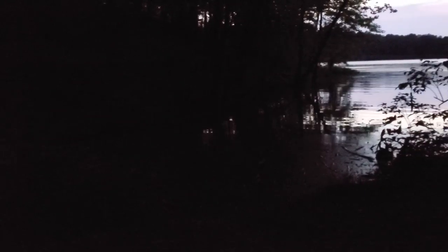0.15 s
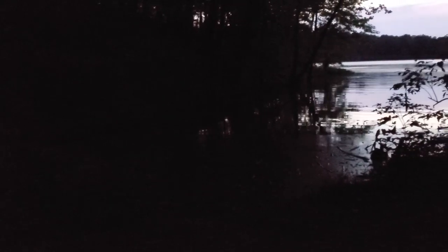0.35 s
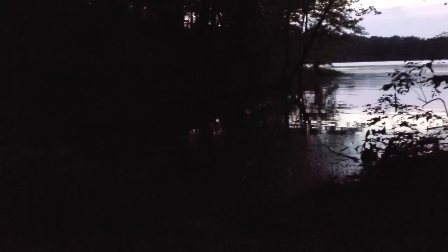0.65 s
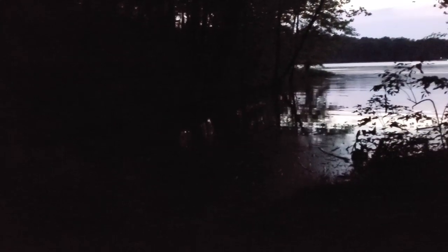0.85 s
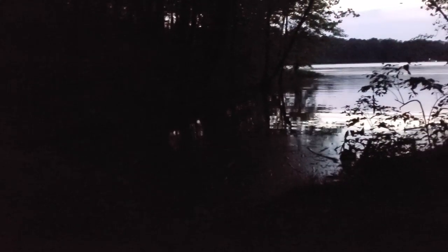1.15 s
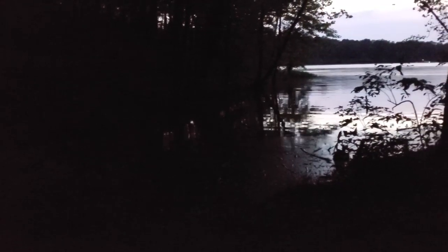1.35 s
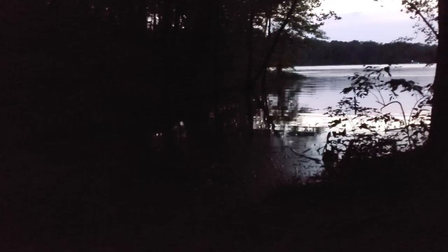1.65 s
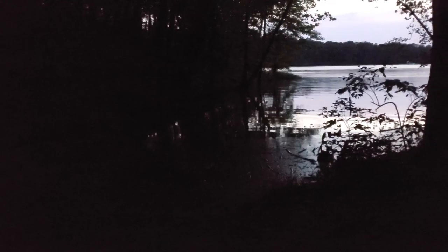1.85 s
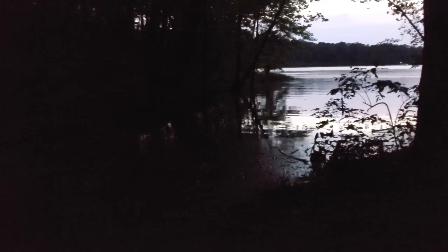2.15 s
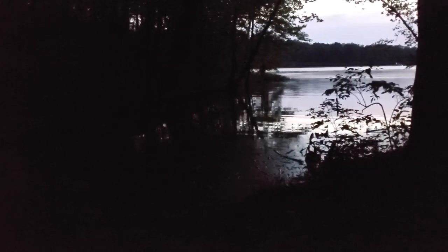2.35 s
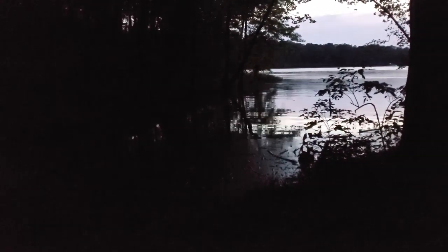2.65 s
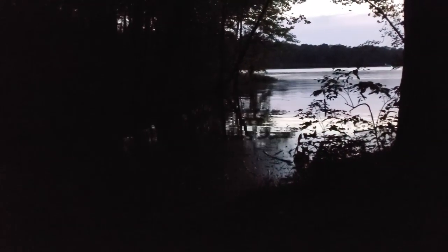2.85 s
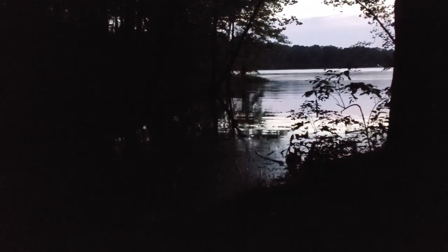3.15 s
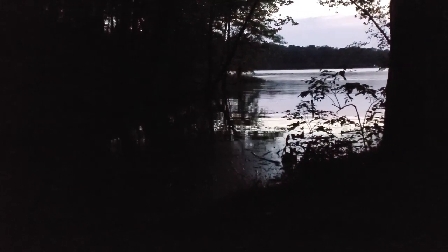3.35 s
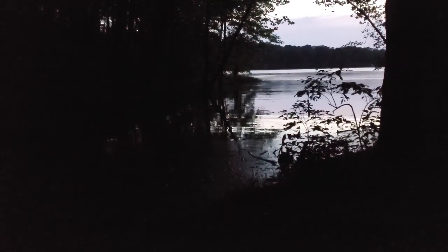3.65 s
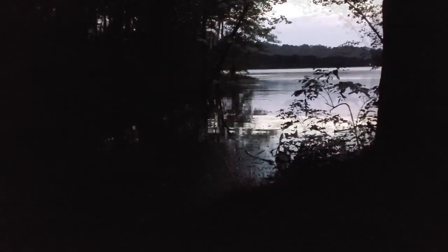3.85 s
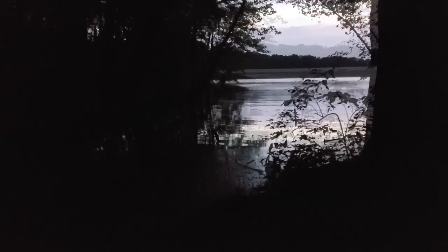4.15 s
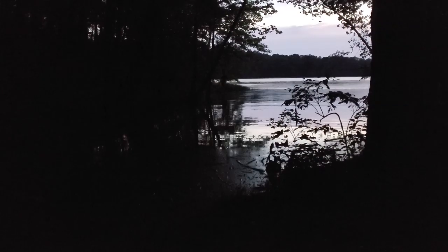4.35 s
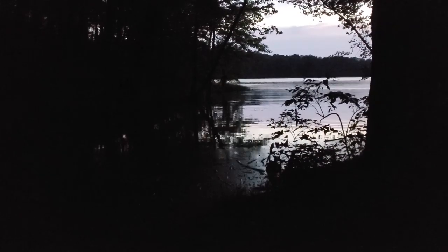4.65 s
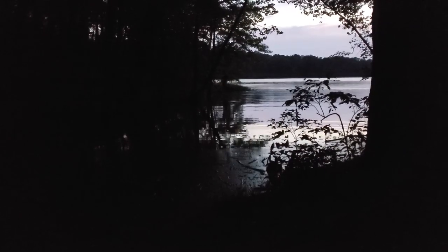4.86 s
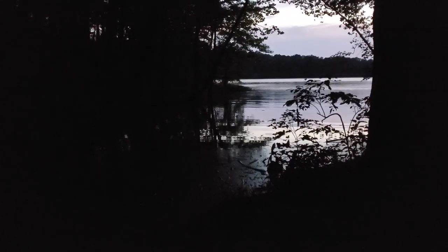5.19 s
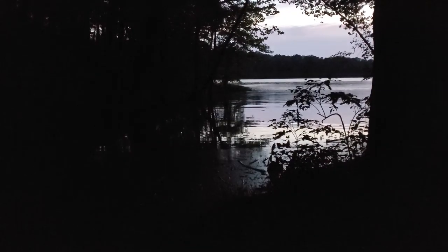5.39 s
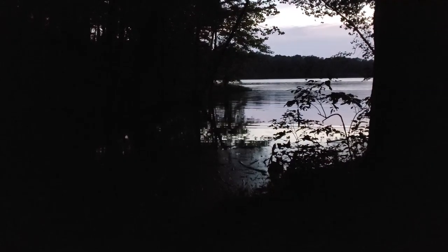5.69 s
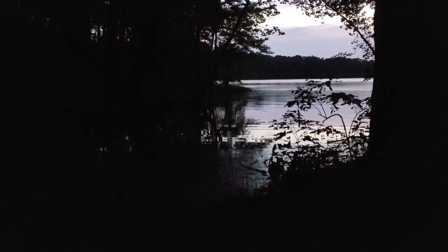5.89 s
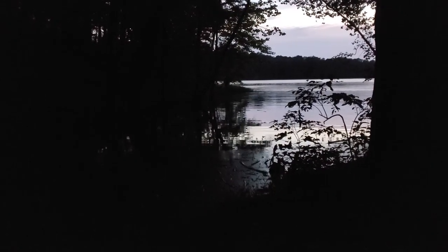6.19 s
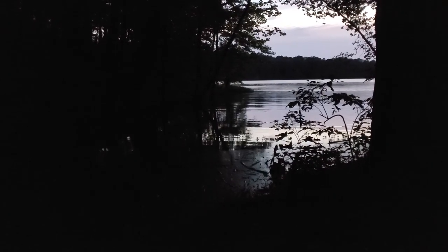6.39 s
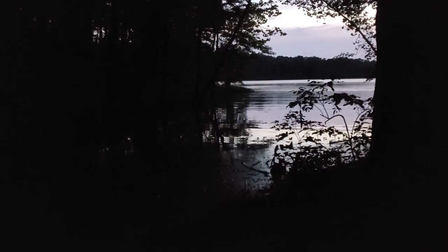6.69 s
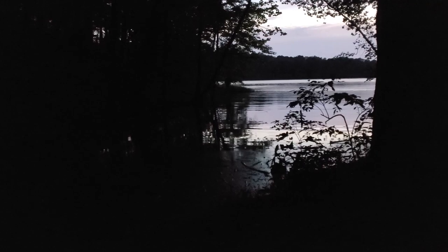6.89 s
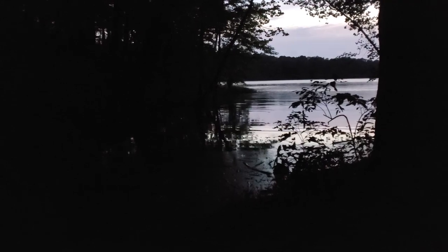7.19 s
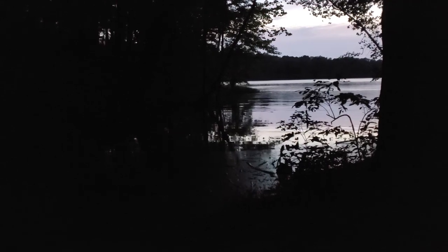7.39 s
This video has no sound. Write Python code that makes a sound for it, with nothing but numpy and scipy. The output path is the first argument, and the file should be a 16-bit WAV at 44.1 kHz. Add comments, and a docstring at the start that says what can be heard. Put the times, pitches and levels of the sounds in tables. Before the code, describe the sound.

On a wooded lake shore at dusk, katydids rasp together about twice a second. Treefrogs add short, high chirps through the first half. Toads, somewhat to the left, stand out with five long buzzing trills that rise, then slow and roughen, two of them overlapping midway. A frog gulps briefly before the last trill. Faint traffic rumble and a low motor hum lie far behind.

```python
"""A katydid chorus rasps in the trees, wings scraping in step twice a second, over far traffic, a motor's
hum and soft evening air: dusk on a wooded lake shore. Treefrogs chirp in short pulse trains. Three toads
on the left give long buzzing trills that rise, then slow and roughen, two sagging in pitch; each pulse
of the vocal cords rings a vocal sac. One dry tick sounds and, late on, a green frog gulps.
The woods answer the frogs and toads faintly."""
import sys
import numpy as np
from scipy import signal
from scipy.fft import rfft, irfft, next_fast_len
from scipy.io import wavfile
from scipy.ndimage import uniform_filter1d, map_coordinates

SR = 44100
rng = np.random.default_rng(int(sys.argv[2]) if len(sys.argv) > 2 else 0)


def int16_out(signal):
    """Quantize to a 16-bit WAV file."""
    q = np.round(np.clip(np.atleast_2d(signal).T, -1, 1) * 32767)
    wavfile.write(sys.argv[1], SR, q.astype(np.int16))


N = 332220
TIME_S = np.arange(N) / SR


def amp(db):
    """Decibels to gain."""
    return 10 ** (np.asarray(db) / 20)


def unit(x):
    """Scale to rms 1."""
    return x / np.sqrt(np.mean(x ** 2) + 1e-20)


def along(points, hz):
    """Read (Hz, value) points on a log axis."""
    f, v = np.transpose(points)
    return np.interp(np.log(hz + 1), np.log(f + 1), v)


def curve(points):
    """Read (s, value) points at every sample."""
    return np.interp(TIME_S, *np.transpose(points))


def wobble(knots_per_s):
    """Smooth random curve."""
    knots = rng.standard_normal(int(N * knots_per_s / SR) + 4)
    return map_coordinates(knots, [TIME_S * knots_per_s])


def ramp(x):
    """Quarter-sine rise from 0 to 1."""
    return np.sin(np.pi / 2 * np.clip(x, 0, 1))


def filtered(x, response):
    """Apply a complex frequency response."""
    m = next_fast_len(N + 8192)
    return irfft(rfft(x, m) * response(np.fft.rfftfreq(m, 1 / SR)), m)[..., :N]


def placed(x, left_db, lead_s=0):
    """A source to one side is louder and earlier at the nearer ear."""
    side = np.array([[.5], [-.5]])
    return amp(side * left_db) * filtered(x, lambda hz: np.exp(2j * np.pi * hz * lead_s * side))


def rush(spectrum, correlation, patchy_db):
    """Stereo noise with patches of random gain; mid rms 1."""
    z = signal.stft(rng.standard_normal((2, N)), nperseg=1024)[2]
    patches = uniform_filter1d(rng.standard_normal(z.shape[1:]), size=6, axis=0)
    patches = uniform_filter1d(patches, size=8, axis=1)
    pair = signal.istft(z * amp(patchy_db * unit(patches)), nperseg=1024)[1][:, :N]
    mid, side = filtered(pair, lambda hz: amp(along(spectrum, hz)))
    side = unit(side) * np.sqrt((1 - correlation) / (1 + correlation))
    return np.array([unit(mid) + side, unit(mid) - side])


def katydid_surge(start_s, length_s, db, attack_s=.14, release_s=.28, arch_db=4.5):
    """Envelope: the insects join quickly, crest and drop out more slowly."""
    age_s = TIME_S - start_s
    crest_db = arch_db * (np.sin(np.pi * np.clip(age_s / length_s, 0, 1)) - 1)
    return amp(db + crest_db) * ramp(age_s / attack_s) * ramp((length_s - age_s) / release_s) ** 2


# Chorus surges (start [s], length [s], relative level [dB])
KATYDID_SURGES = [(-.12, 0.51, -50), (0.327, .58, -44.5), (0.833, 0.59, -49.5), (1.377, 0.52, -47.5),
                  (1.88, 0.58, -48), (2.374, 0.62, -48), (2.903, 0.61, -47.4), (3.385, 0.59, -43.6),
                  (3.914, 0.45, -47), (4.302, 0.61, -50), (4.801, .59, -48.5), (5.332, 0.58, -46),
                  (5.852, .57, -48.5), (6.4, 0.55, -47.5), (6.838, 0.57, -46.5), (7.405, .6, -49.5)]
# Spectra of katydid wing rasp, high sizzle and a far toad chorus (frequency [Hz], relative level [dB])
RASP_SPECTRUM = [(700, -56), (1300, -23.5), (2100, -0.5), (2650, -5.5), (3200, 2.5), (3900, -5), (4650, -2),
                 (6000, -8.5), (6900, -19), (7400, -31.5), (9000, -33.5), (12000, -49)]
SIZZLE_SPECTRUM = [(5000, -49), (7500, -17), (9000, -21), (10500, -9.5), (12000, -2), (14000, 1),
                   (15800, -2.5)]
FAR_CHORUS_SPECTRUM = [(700, -59), (1000, -41), (1250, -20.5), (1660, -11), (2010, 0), (2520, -4.5),
                       (3130, 1), (3890, -8), (4540, -2.5), (5700, -9), (6830, -15), (7510, -34.5),
                       (8990, -35), (12600, -24), (15800, -18.5)]


def katydids(rasp_gain_db=11, sizzle_gain_db=2.5, rasp_lull_db=-47, sizzle_lull_db=-61.5, far_db=-41.5):
    """Many wings scrape in step, a few through the lulls; tooth strokes give a fine grain. A far chorus of
    distant toads hums steadily underneath."""
    chorus = np.sqrt(sum(katydid_surge(*row) ** 2 for row in KATYDID_SURGES))
    teeth = amp(wobble(420) + .6 * wobble(35))
    rasp = placed(rush(RASP_SPECTRUM, correlation=0, patchy_db=1), left_db=2.5)
    rasp *= np.hypot(amp(rasp_gain_db) * chorus, amp(rasp_lull_db))
    sizzle = placed(rush(SIZZLE_SPECTRUM, correlation=0, patchy_db=-.3), left_db=1)
    sizzle *= np.hypot(amp(sizzle_gain_db) * chorus, amp(sizzle_lull_db))
    far = placed(rush(FAR_CHORUS_SPECTRUM, correlation=0, patchy_db=2), left_db=3)
    return teeth * (rasp + sizzle) + amp(far_db) * far


# Road rumble (frequency [Hz], relative level [dB])
TRAFFIC_SPECTRUM = [(20, -24), (45, -5), (90, 0.5), (140, -7), (220, -9.5), (320, -18), (500, -26.5),
                    (900, -44.5)]


def traffic(level_db=-52, pass_db=3.5, pass_at_s=3.66, pass_width_s=.37):
    """Far rumble; swells once as a vehicle goes by."""
    swell_db = pass_db * np.exp(-((TIME_S - pass_at_s) / pass_width_s) ** 2)
    rumble = rush(TRAFFIC_SPECTRUM, correlation=.96, patchy_db=1.5)
    return placed(amp(level_db + swell_db) * rumble, left_db=1)


# Air rush (frequency [Hz], relative level [dB])
AIR_SPECTRUM = [(150, -11), (300, -21), (480, 0.5), (700, -6.5), (950, -2.5), (1300, 5.5), (1700, -24),
                (2500, -33)]
# Air swells (time [s], relative level [dB])
AIR_ENVELOPE = [(0.0, -68.5), (0.33, -72.5), (1.28, -65), (2.16, -72), (2.79, -67), (5.03, -75), (5.2, -83),
                (5.7, -89.5), (6.02, -77.5), (7.28, -78.5), (7.53, -73)]


def evening_air(gain_db=8):
    """A soft rush that rises and falls."""
    air = rush(AIR_SPECTRUM, correlation=.1, patchy_db=4)
    return placed(amp(curve(AIR_ENVELOPE) + gain_db) * air, left_db=1.5)


# Motor hum (time [s], level [dB])
MOTOR_ENVELOPE = [(3.5, -56.5), (5, -66), (7.53, -61)]


def motor(hum_hz=125, waver_hz=1.45, waver_db=1.7):
    """An unsteady hum from across the water."""
    level_db = curve(MOTOR_ENVELOPE) + waver_db * wobble(5.9)
    phase = 2 * np.pi * np.cumsum(hum_hz + waver_hz * wobble(6)) / SR
    return placed(amp(level_db) * unit(np.sin(phase)), left_db=1)


def far_chirps(count=6, until_s=2.6, relative_db=-35.5, pitch_hz=2400):
    """Chirp rows for distant treefrogs, loosely spaced."""
    return [((k + when) * until_s / count, relative_db + 4 * (size - .5), pitch_hz + 220 * (detune - .5))
            for k, (when, size, detune) in enumerate(rng.random((count, 3)))]


# Treefrog chirps, near and distant (start [s], relative level [dB], base pitch [Hz])
TREEFROG_CHIRPS = [(0.1328, -26, 2500), (.254, -34, 2365), (.2755, -25.5, 2580), (.424, -36, 2310),
                   (.571, -30, 2370), (0.768, -27, 2610), (.864, -34, 2270), (.894, -30, 2350),
                   (1.026, -29, 2530), (1.284, -30, 2320), (1.413, -29, 2370), (1.674, -25.5, 2500),
                   (1.828, -23.5, 2573), (2.076, -35, 2370), (2.429, -36, 2470), (2.474, -34, 2270),
                   (2.577, -28, 2530), (2.747, -26, 2510), (2.899, -23, 2575), (2.977, -27.5, 2570),
                   (3.174, -30, 2520), (3.482, -30, 2584)]


def treefrogs(pulses=4, gap_s=.015, rise_s=.0019, fade_s=.034, gain_db=2, arch=.038):
    """A chirp is a few fading pulses arching in pitch; each pulse slides down."""
    out = np.zeros(N + SR)
    t = np.arange(SR // 40) / SR
    swell = (t / rise_s * np.exp(1 - t / rise_s / 2) / 2) ** 2
    for start_s, db, base_hz in TREEFROG_CHIRPS + far_chirps():
        for k, (jitter_db, detune, phase) in enumerate(rng.standard_normal((pulses, 3))):
            bend = arch * np.sin(np.pi * k / (pulses - 1)) + .015 * detune - 1.54 * t
            pulse = swell * np.sin(2 * np.pi * (base_hz * (1 + bend) * t + phase))
            gain = amp(db + gain_db + jitter_db) * np.exp(-(k * gap_s / fade_s) ** 2)
            out[round((start_s + k * gap_s) * SR):][:len(t)] += gain * pulse
    return placed(out[:N], left_db=3, lead_s=.0005)


def toad_effort(voice, start_s, length_s, pitch_hz, sag_hz_per_s, base_db, swell_db_per_s, push_db, push_s,
                scoop_hz=299.6, scoop_s=.055, attack_db=24.5, attack_s=.023, slowing_hz=33, fill_s=.19):
    """A trill scoops up to one hard push; its pulses slow as the air runs out."""
    pulse_hz, full_sac_hz, slack_hz, push_at_s, flatness, overshoot_hz, overshoot_s = voice
    age_s = np.maximum(TIME_S - start_s, 0)
    # the push builds more slowly than it ends
    from_push_s = np.where(age_s < push_at_s, (push_at_s - age_s) / 1.55, age_s - push_at_s)
    push = np.exp(-(from_push_s / push_s) ** flatness)
    overshoot = np.exp(-(from_push_s / overshoot_s) ** 2)
    glide_hz = overshoot_hz * overshoot - scoop_hz * np.exp(-age_s / scoop_s) - sag_hz_per_s * age_s
    tone_hz = pitch_hz + glide_hz + 6.06 * wobble(18)
    rate_hz = pulse_hz - slowing_hz * np.minimum(age_s / length_s, 1) ** 1.2
    # the sac follows most of the glide and sounds lower until full
    sac_hz = full_sac_hz + .8 * glide_hz - slack_hz * np.exp(-age_s / fill_s)
    level_db = base_db + swell_db_per_s * age_s + push_db * push - attack_db * np.exp(-age_s / attack_s)
    return tone_hz, rate_hz, sac_hz, level_db


# Vocal sac modes (ratio to main resonance, relative level in short pulses [dB])
SAC_MODES = [(0.669, -29), (0.998, 0), (1.17, -22)]


def toad_trill(voice, start_s, length_s, hoarse_s, shape, opening_s=.2, long_s=.0016, short_s=.0011):
    """The vocal cords' tone is chopped into pulses; each rings the vocal sac."""
    tone_hz, rate_hz, sac_hz, level_db = toad_effort(voice, start_s, length_s, *shape)
    at = np.flatnonzero(np.diff(np.floor(np.cumsum(rate_hz) / SR)))  # pulse centres
    at = at[(at > start_s * SR) & (at < (start_s + length_s) * SR)]
    age_s = at / SR - start_s
    slip, drift, size = rng.standard_normal((len(at), 3)).T
    # long, pure pulses at first; then they shorten and fall out of step with the tone
    tight = np.clip((age_s - opening_s) / .1 + .5, 0, 1)
    hoarse = np.clip((age_s - hoarse_s) / .1 + .5, 0, 1)
    stray_rad = (.12 + .5 * tight) * slip + np.cumsum((.04 + 1.25 * hoarse) * drift)
    phase = (2 * np.pi * np.cumsum(tone_hz)[at] / SR + stray_rad)[:, None]
    width_s = (long_s + (short_s - long_s) * tight)[:, None]
    offset = np.arange(-256, 257)
    t = offset / SR
    # only short, hard pulses wake the weaker modes
    ring = sum(amp(db * (2 - tight))[:, None] * np.cos(phase + 2 * np.pi * ratio * sac_hz[at, None] * t)
               for ratio, db in SAC_MODES)
    strength = amp(level_db[at] + (.3 + .45 * hoarse) * size)[:, None]
    train_rms = np.sqrt(np.sqrt(np.pi) / 2 * width_s * rate_hz[at, None])
    pulses = strength * ring * np.exp(-.5 * (t / width_s) ** 2) / train_rms
    return np.bincount((at[:, None] + offset).ravel(), pulses.ravel(), N)[:N]


# Trills (toad, start [s], length [s], hoarse after [s], pitch [Hz], sag [Hz/s], base level [dB],
# swell [dB/s], push [dB], push width [s])
TOAD_TRILLS = [("near", .865, 1.055, .225, 1822, 0, -31, 4.7, 10.3, 0.084),
               ("far", 2.655, 0.92, .55, 1945, 240, -40.5, 4.2, 4, 0.068),
               ("loud", 3.655, 1.545, .9, 1958, 110, -35, 0, 15.3, 0.23),
               ("near", 3.982, 1.178, 0.2306, 1805, 0, -30.5, 4.5, 9.5, 0.067),
               ("loud", 6.19, 1.65, 1.0, 1977, 205, -22, -1.25, 4.2, 0.053)]
# Voice per toad (opening pulse rate [Hz], full sac [Hz], empty sac drop [Hz], push after [s],
# push flatness, pitch overshoot [Hz], overshoot width [s])
TOAD_VOICES = {"near": (168, 1917, 14, .156, 3.4, 138, .066),
               "loud": (180, 2012, 204, 0.214, 1.73, 50.3, 0.0201),
               "far": (177, 2027, 110, 0.142, 2.5, 9.7, 0.0596)}
# Position per toad (left over right [dB], left lead [s])
TOAD_PERCHES = {"near": (9.8, .00031), "loud": (2.9, .00042), "far": (6, .00014)}


def toads(bank_db=-20, bank_delay_s=.00341):
    """Each toad calls from its own place; the bank behind throws every pulse back."""
    song = np.zeros((2, N))
    for toad, start_s, length_s, hoarse_s, *shape in TOAD_TRILLS:
        trill = toad_trill(TOAD_VOICES[toad], start_s, length_s, hoarse_s, shape)
        song += placed(trill, *TOAD_PERCHES[toad])
    return filtered(song, lambda hz: 1 + amp(bank_db) * np.exp(-2j * np.pi * hz * bank_delay_s))


# Tick onset (time [s], relative level [dB])
TICK_ONSETS = [(2.9001, -20.5)]
# Tick noise (frequency [Hz], relative level [dB])
TICK_SPECTRUM = [(300, -21), (2500, -11), (5500, 6), (7000, 1), (8500, -19), (15000, -18)]


def tick(t60_s=.0096, gain_db=-7):
    """One dry tick in the undergrowth."""
    snap = sum(amp(db + gain_db - 60 * np.abs(TIME_S - at_s) / t60_s) * (TIME_S >= at_s)
               for at_s, db in TICK_ONSETS)
    return snap * rush(TICK_SPECTRUM, correlation=.29, patchy_db=0)


# Gulps (start [s], length [s], level [dB], pitch [Hz], fade over the note [dB])
FROG_GULPS = [(5.8, 0.035, -26, 463, 20.5), (5.902, .054, -39, 488, 5), (6.034, 0.041, -39.2, 501, 6),
              (6.07, 0.023, -36, 470, 4.5), (6.163, 0.031, -50, 309, -2.5)]


def green_frog(throb_hz=92, throb_depth=.52, overtone_db=-20, body_hz=190, body_db=-14, edge_s=.0036):
    """Plucked gulps: a throbbing throat tone over a low body resonance."""
    out = np.zeros(N)
    for start_s, length_s, db, hz, fade_db in FROG_GULPS:
        age_s = np.clip(TIME_S - start_s, 0, length_s)
        phase = 2 * np.pi * hz * age_s + .81 * wobble(130)
        throat = np.sin(phase) + amp(overtone_db) * np.sin(2 * phase)
        body = amp(body_db) * np.sin(2 * np.pi * body_hz * age_s)
        throb = 1 + throb_depth * np.cos(2 * np.pi * throb_hz * age_s)
        gate = ramp(np.minimum(age_s, length_s - age_s) / edge_s) ** 2
        out += gate * amp(db - fade_db * age_s / length_s) * (throat + body) * throb
    return placed(out, left_db=3, lead_s=.0004)


# Echo decay (frequency [Hz], t60 [s])
WOODS_DECAY = [(300, 0.48), (2000, 0.45), (8000, 0.11)]


def woods(x):
    """Trunks and leaves scatter a short, diffuse tail."""
    hz, t, z = signal.stft(rng.standard_normal((2, SR // 2)), SR, nperseg=256)
    decay = amp(-60 * t / along(WOODS_DECAY, hz)[:, None])
    tail = signal.istft(z * decay, SR, nperseg=256)[1]
    return signal.fftconvolve(x[:1], tail / np.linalg.norm(tail[0]), axes=1)[:, :N]


def scene(call_echo_db=-19, chirp_echo_db=-12.5):
    """Callers and their echo over the chorus and the far background."""
    calls = toads() + green_frog()
    chirps = treefrogs()
    echo = woods(amp(call_echo_db) * calls + amp(chirp_echo_db) * chirps)
    return calls + chirps + echo + tick() + katydids() + traffic() + evening_air() + motor()


def record(dry):
    """Brick-wall low-pass at 15950 Hz."""
    return filtered(dry, lambda hz: hz < 15950)


dry = scene()
out = record(dry)
int16_out(out)
```